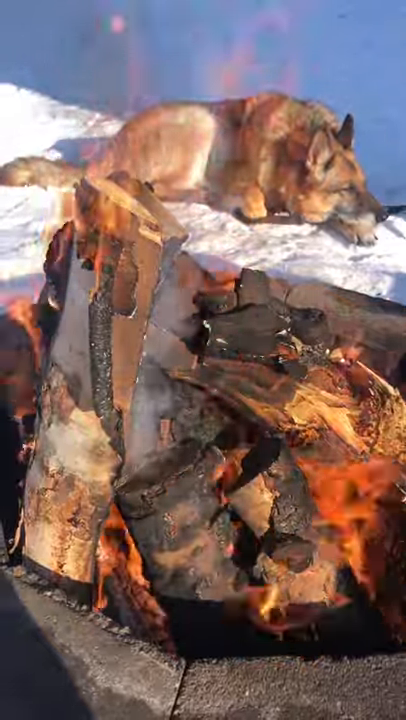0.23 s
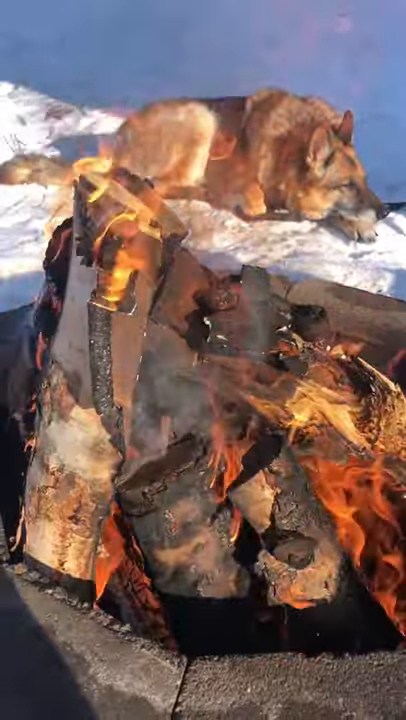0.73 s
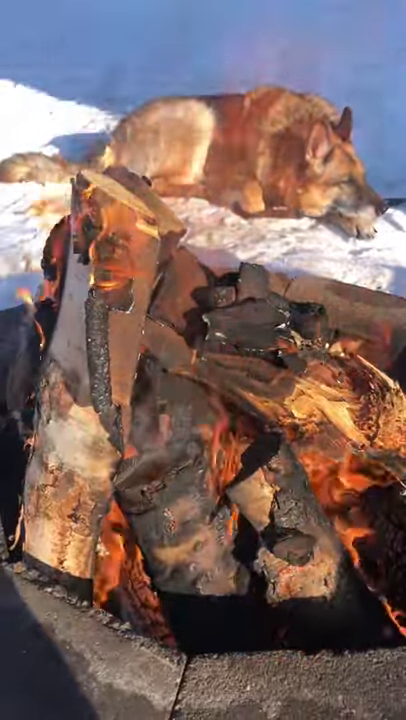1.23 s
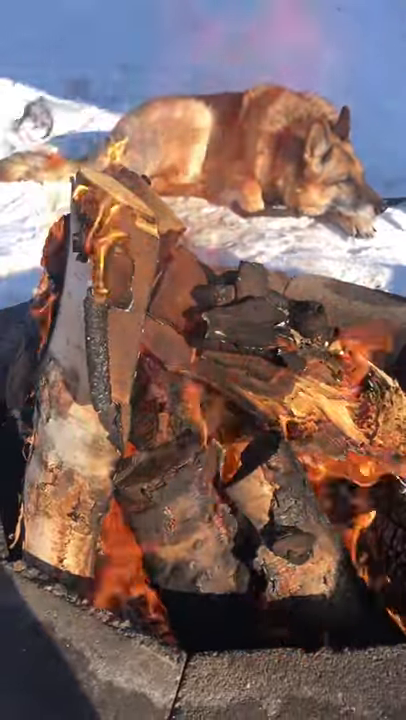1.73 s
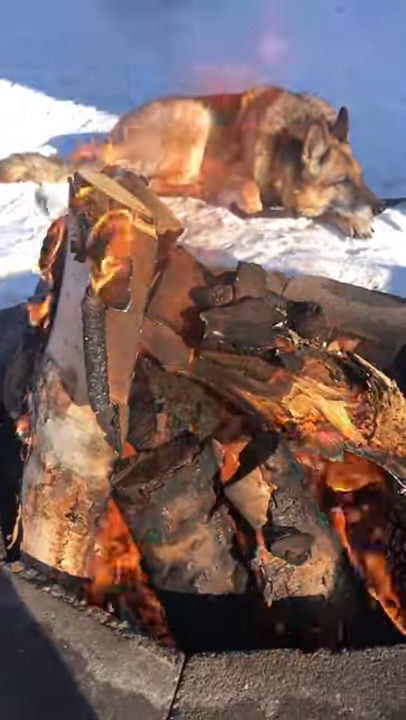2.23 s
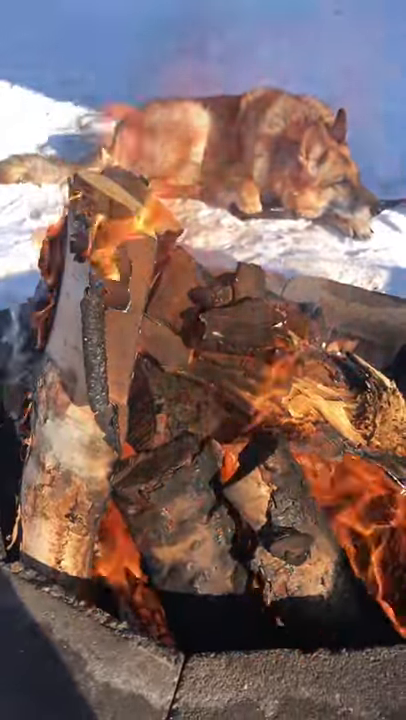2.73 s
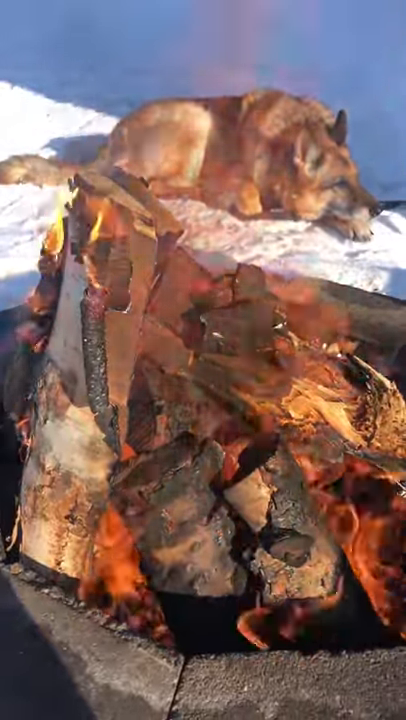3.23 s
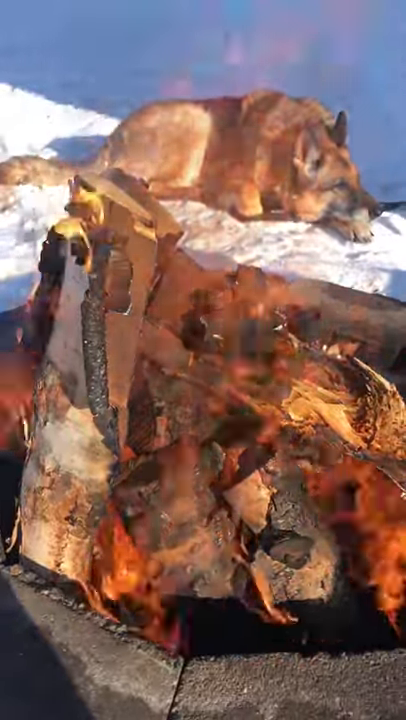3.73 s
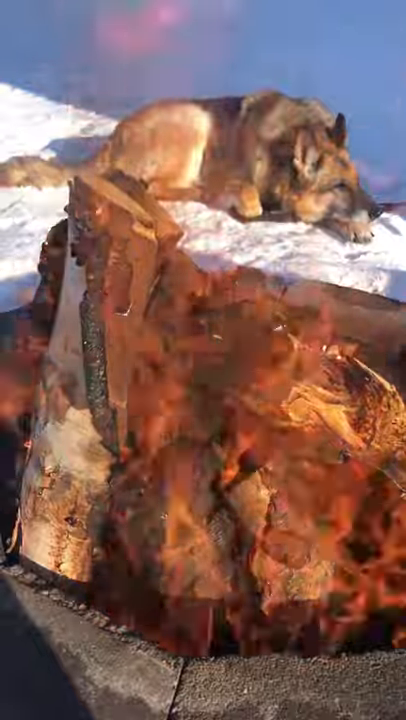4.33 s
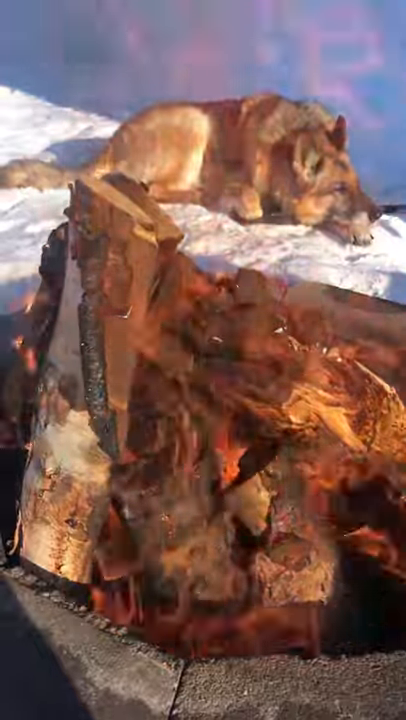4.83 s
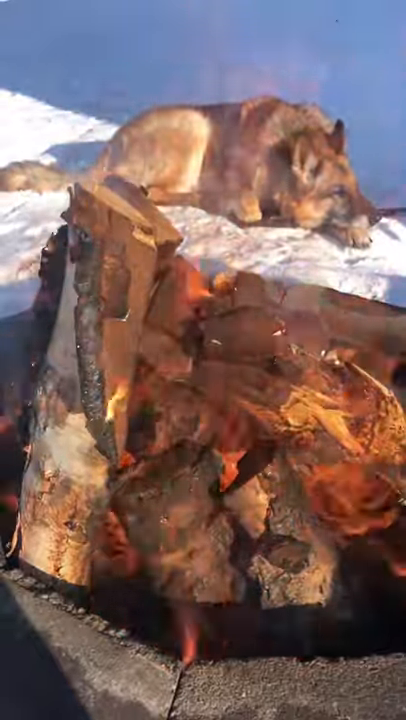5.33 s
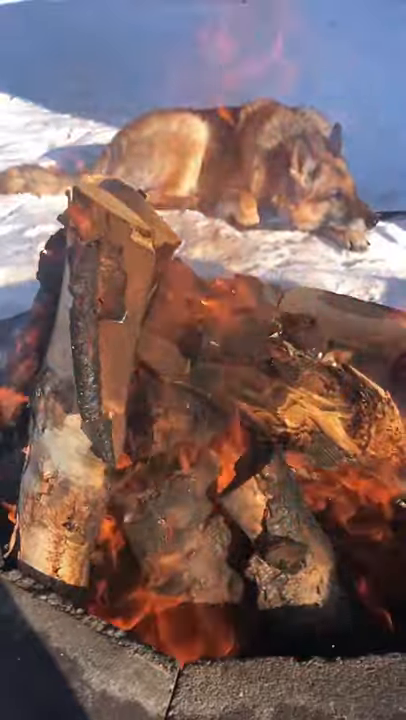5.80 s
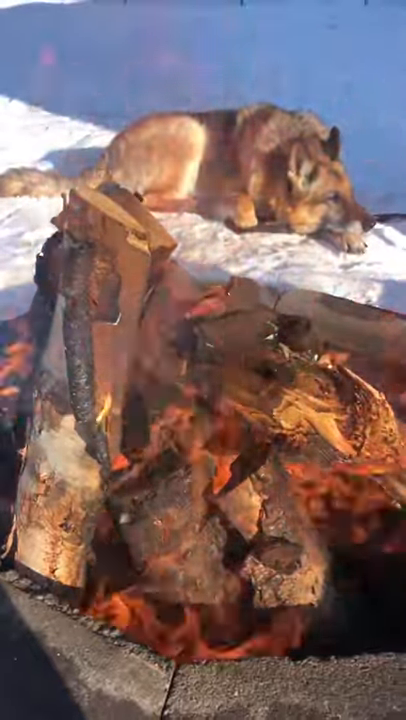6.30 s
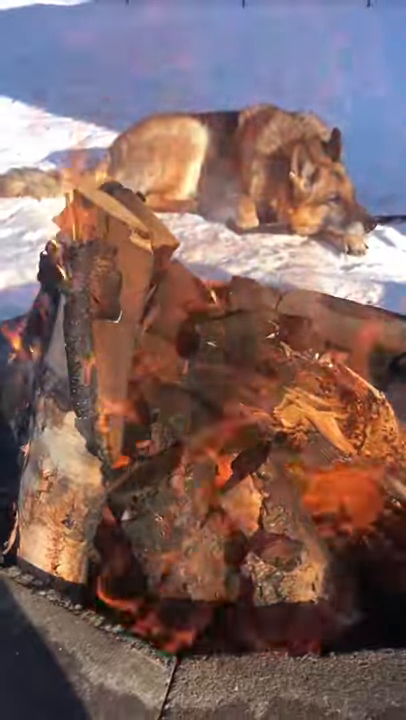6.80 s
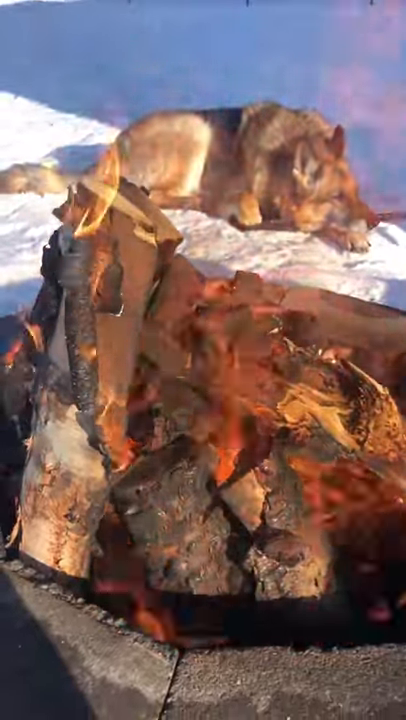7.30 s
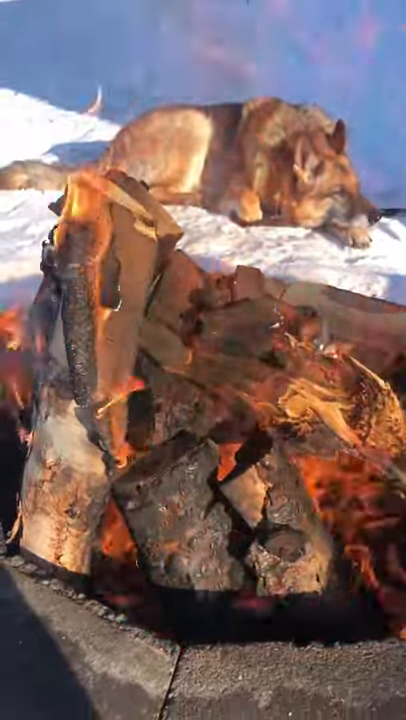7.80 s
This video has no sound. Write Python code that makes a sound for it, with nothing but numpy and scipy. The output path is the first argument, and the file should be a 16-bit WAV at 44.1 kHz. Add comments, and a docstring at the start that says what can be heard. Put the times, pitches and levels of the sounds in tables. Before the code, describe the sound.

Logs burn in a stone fire pit in the open air, close to the microphone. Throughout, the flames give a soft, low rumble and rush beneath a thin, flickering hiss of steam and a fine crackle of tiny ticks. Short, dry, bright cracks stand out at irregular moments, with almost no echo. A loud crack just after the start opens a busy spell of snapping that thins out by 3 seconds. A sharp pop comes at about 3.7 seconds. Around 4 seconds the hiss and fine crackle sink briefly while the rumble carries on, then return with scattered snaps, a clearer one at 5 seconds. Another loud crack comes at 6 seconds. From about 6.7 seconds the wood spits thick and fast, with strong pops near 7.4 and 7.7 seconds and a last loud crack at 8 seconds.

```python
"""Logs burning in a stone fire pit in the open air, close to the microphone.
From the start the flames roar low under a thin hiss of steam, and pockets of steam and gas burst in
the wood as short cracks, each thrown back by the logs and stones for a few milliseconds. A loud crack
opens a busy spell that thins out by three seconds; around four the hiss and fine crackle sink briefly.
Another loud crack comes at six seconds, then the wood spits thick and fast to the end."""
import sys
import numpy as np
from scipy import signal
from scipy.fft import rfft, irfft
from scipy.io import wavfile
from scipy.ndimage import uniform_filter1d

SR = 44100
rng = np.random.default_rng(int(sys.argv[2]) if len(sys.argv) > 2 else 0)


def persist_wave(psi):
    """Save psi, clipped to +-1, as 16-bit WAV."""
    counts = np.round(np.clip(psi, -1, 1) * 32767).astype(np.int16)
    wavfile.write(sys.argv[1], SR, np.atleast_2d(counts).T)


N = 355093
LEAD_IN = 64  # samples ahead of each burst's onset


def gain_of(db):
    return 10 ** (np.asarray(db) / 20)


def unit_rms(x):
    return x / np.sqrt(np.mean(x ** 2) + 1e-20)


def db_at(spectrum, hz):
    points_hz, db = np.transpose(spectrum)
    return np.interp(np.log(hz + 1), np.log(points_hz + 1), db)


def gain_curve(table, column):
    rows = np.array(table)
    return gain_of(np.interp(np.arange(N) / SR, rows[:, 0], rows[:, column]))


def noise(spectrum, size, patchy_db, flicker_db):
    """Noise of unit RMS with drifting patches in its spectrum and a flicker shared by all bands."""
    hop = size // 4
    frames, hz = N // hop + 5, np.fft.rfftfreq(size, 1 / SR)
    real, imag, patches = rng.standard_normal((frames, len(hz), 3)).T
    patches = unit_rms(uniform_filter1d(uniform_filter1d(patches, size=6, axis=0), size=8, axis=1))
    flicker = unit_rms(uniform_filter1d(rng.standard_normal(frames), size=3))
    shape_db = db_at(spectrum, hz)[:, None] + patchy_db * patches + flicker_db * flicker
    spectra = (real + 1j * imag) * gain_of(shape_db)
    return unit_rms(signal.istft(spectra, nperseg=size, noverlap=size - hop)[1][:N])


# The draught through the pit. Each row: time in seconds, rumble level in dB, rush level in dB.
DRAUGHT = [(0, -44, -52), (.9, -43, -53.5), (2.1, -41, -51), (2.7, -42, -51), (3.2, -41, -49),
           (4.1, -40.5, -50), (4.7, -41.5, -50), (5.6, -40.5, -50.5), (6.6, -42.5, -48.5),
           (7.2, -43.5, -51), (8.05, -43, -50.5)]
# The tone of the rumble and of the rush. Each row: frequency in Hz, relative spectral level in dB.
RUMBLE_SPECTRUM = [(15, -70), (28, -33), (45, -15), (65, 2.5), (103, 1.5), (199, -3), (250, -10),
                   (330, -55.5)]
RUSH_SPECTRUM = [(200, -5.5), (280, 2.5), (400, 2), (822, -7.5), (1080, -8), (1420, -18), (2700, -30),
                 (6000, -84), (15000, -90)]


def flames():
    """Turbulent burning, the bed under it all: a lumpy rumble and the rush of air into the flames."""
    rumble = noise(RUMBLE_SPECTRUM, size=2048, patchy_db=1.15, flicker_db=-0.5)
    rush = noise(RUSH_SPECTRUM, size=1024, patchy_db=1.27, flicker_db=0.97)
    return gain_curve(DRAUGHT, 1) * rumble + gain_curve(DRAUGHT, 2) * rush


# How hard the wood spits. Each row: time in seconds, fine crackle level in dB, hiss level in dB.
SPITTING = [(0, -48.5, -53.5), (.5, -52.5, -54.5), (.9, -49.5, -55.5), (1.4, -48.5, -53.5),
            (2.0, -50.5, -54.5), (2.25, -53, -55.5), (2.6, -49.5, -55.5), (3.0, -53.5, -54.5),
            (3.7, -51, -56), (3.9, -52, -56), (4.05, -60.5, -61), (4.6, -55, -62), (4.9, -50.5, -57),
            (5.3, -54.5, -57), (5.9, -53, -57), (6.3, -51, -55.5), (7.2, -45.5, -54.5), (8.05, -47.5, -54)]
# The steam heard close up. Each row: frequency in Hz, relative spectral level in dB.
HISS_SPECTRUM = [(800, 4), (1500, 5.5), (2730, 1.5), (5710, 2.5), (10000, -0.5), (14400, -2), (15700, 0),
                 (16050, -80)]


def steam_hiss():
    """Steam sputters from the wood in a thin, flickering hiss."""
    return gain_curve(SPITTING, 2) * noise(HISS_SPECTRUM, size=256, patchy_db=0.3, flicker_db=3.5)


# The microphone's response to cracks and ticks. Each row: frequency in Hz, relative gain in dB.
MICROPHONE = [(1000, 0.5), (2200, 0), (4000, 0), (7000, -0.2), (10500, -1), (13000, -3.5), (16000, -8)]
BASS_HZ, TREBLE_HZ, TOP_HZ = 1000, 14000, 16000  # where bass and treble are set; where bursts roll off


def wood_bursts(level_db, pitch_hz, bass_db, treble_db, length_ms, size=1024):
    """One burst a row: fibres tear as dying noise, the pit scatters it, the splinter rings."""
    ms = (np.arange(size) - LEAD_IN) / SR * 1000
    age_ms = np.maximum(ms, 0)
    length_ms = np.clip(length_ms, .05, 4)[:, None]
    tear = (1 - np.exp(-age_ms / (0.25 * length_ms))) * np.exp(-age_ms / (1.21 * length_ms))
    off_logs = gain_of(-31 - 60 * age_ms / 14)
    off_stones = gain_of(-43 - 60 * age_ms / 45)
    envelope = tear + (off_logs + off_stones) * (ms > .3)
    spectra = rfft(envelope * rng.standard_normal((len(level_db), size)))
    # a tear is broad: no deep gaps in its spectrum
    spectra /= uniform_filter1d(abs(spectra) ** 2, size=size // 32, axis=1) ** 0.43 + 1e-9

    hz = np.fft.rfftfreq(size, 1 / SR) + 1
    ring = (1 + (np.log2(hz / pitch_hz[:, None]) / 0.28) ** 2) ** -2.2
    treble_share = np.clip(np.log(hz / BASS_HZ) / np.log(TREBLE_HZ / BASS_HZ), 0, 1)
    broadband = gain_of(bass_db[:, None] * (1 - treble_share) + treble_db[:, None] * treble_share) ** 2
    low_cut_hz = 0.37 * BASS_HZ * (pitch_hz[:, None] / BASS_HZ) ** .52  # smaller splinter, less bass
    band = 1 / (1 + (low_cut_hz / hz) ** 7.8) / (1 + (hz / TOP_HZ) ** 90)
    bursts = irfft(spectra * np.sqrt((ring + broadband) * band) * gain_of(db_at(MICROPHONE, hz)))
    bursts /= np.linalg.norm(bursts, axis=1)[:, None]
    return bursts * gain_of(level_db)[:, None] * np.sqrt(SR / 1000)  # level as RMS over 1 ms


def place(starts_s, bursts):
    """Lays each burst with its onset at its start time."""
    track = np.zeros(N + 2 * bursts.shape[1])
    samples = np.round(starts_s * SR).astype(int)[:, None] + np.arange(bursts.shape[1])
    np.add.at(track, samples, bursts)
    return track[LEAD_IN:N + LEAD_IN]


def fine_crackle(ticks_per_s=170, spread_db=8, biggest_db=18.5):
    """Countless small ticks, most faint: a splitting log spits them in clumps round its cracks."""
    count = int(ticks_per_s * N / SR)
    when, rarity, length = rng.random((count, 3)).T
    octave, bass, treble = rng.standard_normal((count, 3)).T
    t = np.arange(0, N / SR, .001)
    near_crack = sum(np.exp(-.5 * ((t - crack[0]) / .012) ** 2) for crack in CRACKS)
    running_total = np.cumsum(1.8 + np.minimum(near_crack, 1.2))
    starts_s = np.interp(when * running_total[-1], running_total, t)
    ticks = wood_bursts(level_db=np.minimum(-spread_db * np.log(rarity + 1e-9), biggest_db),
                        pitch_hz=np.clip(6500 * 2 ** (.8 * octave), BASS_HZ, TREBLE_HZ),
                        bass_db=-10.5 + 3.1 * bass, treble_db=-8 + 8.3 * treble,
                        length_ms=0.053 + 0.98 * length ** 2, size=512)
    return gain_curve(SPITTING, 1) * unit_rms(place(starts_s, ticks))


# The louder cracks, right in front of the microphone. Each row: start in seconds, level in dB over
# 1 ms, pitch in Hz, bass and treble in dB against the ring at that pitch, length of the tear in ms.
CRACKS = [(0.0133, -32.5, 1180.0, -10, -7, 0.67), (0.0269, -25.5, 5730, -12, -3, 1.3),
          (0.028, -29.5, 5750, -7, -7, 0.43), (0.0554, -29.5, 8100, -18, -10, 0.19),
          (0.1185, -11, 5660, -7.5, -15, 0.19), (0.1472, -25.5, 4970, 0, -1, 0.75),
          (0.1929, -25, 12900, -18, 2, 0.37), (0.2268, -32.5, 5320, -22, -13, 0.36),
          (0.2634, -37, 4430, -12, -13, 0.49), (0.299, -29.5, 1320, -9, -23, 1.03),
          (0.3412, -43, 2040, -16, -18, 0.38), (0.585, -29, 5000, -13, -2, 0.12),
          (0.6038, -28, 8600, -7, 1, 0.33), (0.613, -30, 11540, -18, -9, 0.14),
          (0.6988, -19.5, 6570, -15, 0, 0.25), (0.8015, -33.5, 12400, -5, -4, 0.3),
          (0.8158, -31.5, 1720.0, -11, -23, 0.63), (0.8816, -30, 5080.0, -11, -3, 0.46),
          (0.9033, -29, 6150, -11, -7, 0.85), (0.905, -30, 1193, -3, -13, 0.95),
          (0.9173, -30, 11600, -3, -11, 0.25), (0.985, -23.5, 5360.0, -21, -8, 0.81),
          (1.0699, -26.5, 3900, -15, -13, 0.87), (1.0724, -18.5, 12650, -21, 6, 0.11),
          (1.1392, -18, 8650, -14.5, -21, 0.56), (1.1496, -27.0, 9500, -9, -9, 0.5),
          (1.1661, -32.0, 3320, -19, -20, 1.14), (1.2258, -25.5, 3450, -11, -1, 0.41),
          (1.2319, -26, 13000, -23, -6, 0.25), (1.2458, -28, 7150, -24, -5, 0.97),
          (1.301, -32.5, 6300.0, -21, 1, 0.44), (1.3487, -27, 9860, -17, -14, 1.07),
          (1.3538, -26, 9870, -21, -4, 0.61), (1.3602, -36, 2750, -7, -13, 0.75),
          (1.3694, -32, 5770, -14, -15, 0.99), (1.4569, -28, 12070.0, -13, -13, 0.72),
          (1.4752, -33.0, 3880, -24, -20, 0.71), (1.4831, -28.5, 2755, -4, -5, 0.71),
          (1.5323, -29, 12760, -12, -18, 0.34), (1.6712, -34, 3840, -6, -18, 0.25),
          (1.7119, -33, 9250, -9, -11, 0.89), (1.747, -33, 12830, -15, -7, 0.28),
          (1.8418, -31.5, 6080, -4, -22, 0.29), (1.9044, -29, 8720.0, -12, -30, 0.5),
          (1.915, -28, 8800, -27, -26, 0.59), (1.9544, -33, 9060, -21, -7, 0.42),
          (2.0093, -34, 2434, -8, -9, 0.88), (2.0508, -33.0, 12050, -6, -7, 0.13),
          (2.1424, -32.5, 3520, -14, -9, 0.72), (2.1471, -28.5, 10100, -3, -2, 0.51),
          (2.1536, -35, 12600, -8, -9, 1.27), (2.1672, -33, 5630, -14, -2, 0.27),
          (2.438, -31, 1310.0, -2, -6, 0.6), (2.44, -28.0, 1175, -8, -23, 1.55),
          (2.4908, -34.5, 5180, -4, -7, 0.84), (2.5744, -34, 6180, -5, -8, 0.94),
          (2.5874, -32, 4770, -3, -10, 0.98), (2.641, -34.0, 7340, -12, -1, 0.23),
          (2.6516, -35, 8480, -19, -9, 0.26), (2.6944, -32.5, 9690, -11, -18, 0.23),
          (3.2463, -34.5, 3970, -31, -24, 1.05), (3.495, -29, 7780, -10, -5, 0.38),
          (3.5656, -28, 1104, -10, -28, 1.24), (3.639, -31.5, 8800, -14, 3, 0.75),
          (3.668, -31, 10280, -24, -14, 0.78), (3.7173, -34, 5050, -2, -22, 0.22),
          (3.7216, -15.5, 7070, -20, 1, 0.76), (3.7272, -26, 12540, -19, -5, 1.8),
          (4.009, -35.5, 7300, -7, -3, 0.65), (4.0183, -36.5, 7900, -7, -9, 1.1),
          (4.0998, -32.5, 11430.0, -28, -5, 0.18), (4.1807, -33.5, 2130.0, -12, 1, 0.27),
          (4.235, -26.5, 5420, -6, -21, 0.23), (4.3218, -22.5, 5460, -21, 0, 0.94),
          (4.4467, -26, 5520, -6, -1, 1.94), (4.527, -36.5, 7480, -13, 0, 1.97),
          (4.6784, -29.5, 8330, -16, -14, 0.53), (4.6923, -27.5, 11430.0, -20, 3, 0.1),
          (4.8968, -27.5, 4940, -11, -2, 1.3), (5.0173, -18.0, 5300, -19, -0.5, 0.25),
          (5.0233, -31, 5630, -14, -9, 0.77), (5.161, -32, 3150, -10, -9, 0.71),
          (5.2031, -34.5, 5030, -7, -19, 0.71), (5.2152, -31.5, 9720.0, -15, -1, 0.12),
          (5.272, -32, 7040, -17, -14, 0.73), (5.2894, -30.5, 4510, -9, -7, 0.99),
          (5.3167, -25.5, 4400, -20, -7, 0.68), (5.3384, -21.5, 10330, -17.5, -6, 0.24),
          (5.3886, -30.5, 10830.0, -14, -12, 0.31), (5.4005, -33, 4830, -8, -15, 0.24),
          (5.534, -35.5, 2140, -16, -14, 0.86), (5.6328, -32, 7000, -14, -5, 1.9),
          (5.7091, -36.5, 11330, -13, 0, 0.39), (5.789, -31.5, 12070.0, -13, -14, 0.36),
          (5.8025, -32.5, 4650, -14, -13, 0.75), (5.831, -38, 12670, -21, -9, 0.34),
          (5.8418, -27.5, 4760, -11.5, -15, 0.13), (6.0533, -12.5, 7000, -19.5, -4, 1.3),
          (6.116, -34, 12160, -3, -9, 1.2), (6.126, -33.5, 6220, -10, -3, 0.48),
          (6.1312, -31, 13750, -5, -9, 0.54), (6.1825, -25.0, 8400, -7.5, -6, 1.4),
          (6.2103, -32.5, 6900, -8, -12, 1.05), (6.2295, -33, 2430, -8, -20, 1.14),
          (6.2668, -31, 4900, -10, -27, 0.39), (6.3277, -34, 7000, -14, 2, 1.17),
          (6.4255, -31.5, 6360, -17, 5, 1.8), (6.6571, -28, 13570, -9, -5, 0.28),
          (6.6739, -36, 2520, -7, -9, 0.34), (6.7293, -28, 8080, -12, -5, 0.5),
          (6.7622, -30.5, 13450.0, -14, -9, 0.47), (6.7687, -30.5, 2560, -10, -7, 0.22),
          (6.775, -24, 4400, -13, 2, 0.45), (6.7928, -25, 13200, -19, -5, 0.39),
          (6.8063, -27.5, 7300, -8, -23, 0.19), (6.8639, -29.5, 11100, -4, -3, 0.4),
          (6.9247, -24.5, 2730, -8, -11, 0.37), (6.931, -19.0, 4910, -13, -4.5, 0.17),
          (6.94, -25.5, 3856, -16, 0, 0.17), (6.9521, -28, 9100, -10, -6, 0.7),
          (6.9712, -25.5, 3960, -4, -8, 0.41), (7.0983, -33, 5050, -10, -12, 0.92),
          (7.104, -32.0, 4250, -9, -14, 0.16), (7.1827, -24.0, 8300, -9, -10, 0.59),
          (7.1872, -31.5, 8900, -18, -12, 0.12), (7.1931, -22, 5520, -12, -1, 1),
          (7.2005, -25, 4930, -12, -10, 0.42), (7.242, -16.0, 5750, -22.5, -15, 0.27),
          (7.3067, -34, 7020.0, -27, 0, 1), (7.3512, -18, 4240, -15, -4.5, 0.59),
          (7.3657, -23.5, 2860, -9, -18, 1), (7.4071, -32, 7410.0, -1, -14, 0.23),
          (7.4464, -12.5, 7500, -18.5, -3, 0.24), (7.478, -26, 5200, -24, -2, 0.45),
          (7.5282, -27.0, 12770, -22, -7, 0.12), (7.5437, -21, 7800, -10, 0, 0.37),
          (7.5476, -40, 11850, -2, -9, 0.31), (7.5602, -40, 2007, -1, -16, 0.64),
          (7.6348, -36.5, 2530, -14, -17, 1), (7.6681, -25.5, 4930, -10, -6, 0.58),
          (7.681, -31.5, 4760, -7, -15, 0.35), (7.7184, -14.0, 6900, -5, 2, 0.44),
          (7.7726, -34, 2530, -17, -27, 0.29), (7.8205, -36.5, 2420, -17, -25, 0.78),
          (7.8273, -38, 7360, -13, -6, 0.14), (7.8373, -34, 5970.0, -4, -12, 0.44),
          (7.8437, -41, 4340, -10, -7, 1.39), (7.9406, -19.5, 5300, -13, -16, 0.63),
          (7.9441, -28, 4600, -7, -12, 0.57), (7.9516, -16, 9700, -35, -4, 0.13),
          (8.0208, -31, 2630, -16, -3, 1.1), (8.036, -10.0, 9800, -12.5, -7, 0.72),
          (8.0371, -22.5, 6900, -15, -13, 1)]


def cracks():
    """Pockets of steam and gas burst in the logs and stand out one by one."""
    starts_s, *settings = np.transpose(CRACKS)
    return place(starts_s, wood_bursts(*settings))


def scene():
    """The whole fire from beside the pit, in mono."""
    return (cracks() + flames() + steam_hiss() + fine_crackle())[None]


def record(dry):
    """The microphone's chain passes nothing much above 17 kHz."""
    low_pass = signal.firwin(511, 17000, window=("kaiser", 9), fs=SR)
    return signal.oaconvolve(dry, low_pass[None], "same")


dry = scene()
out = record(dry)
persist_wave(out)
```